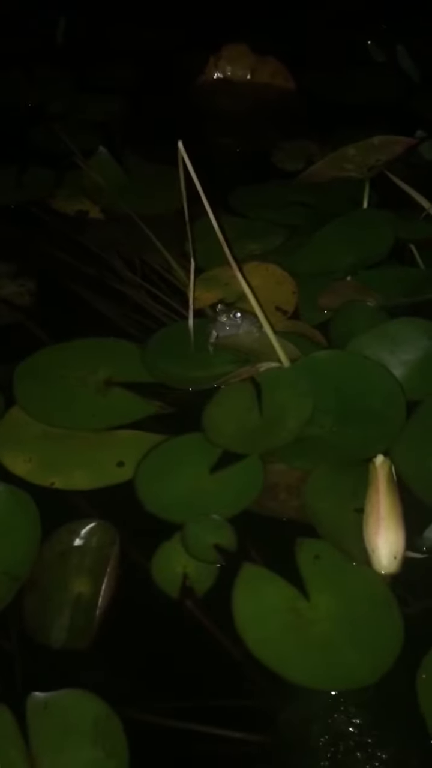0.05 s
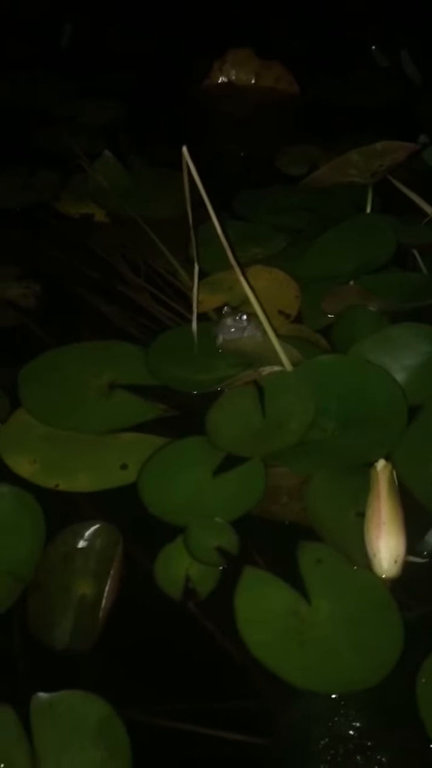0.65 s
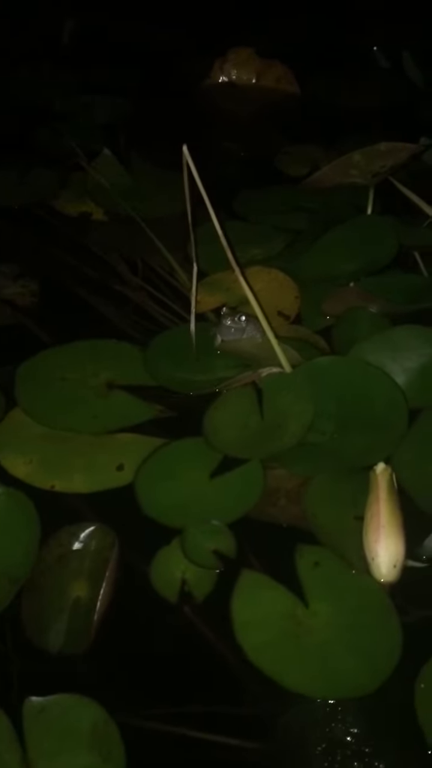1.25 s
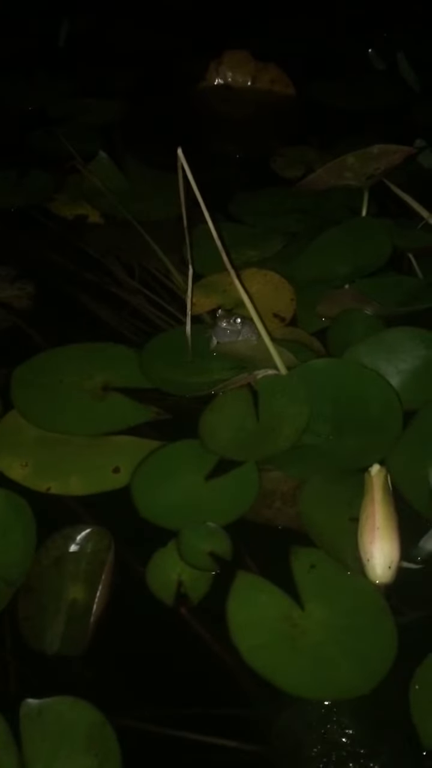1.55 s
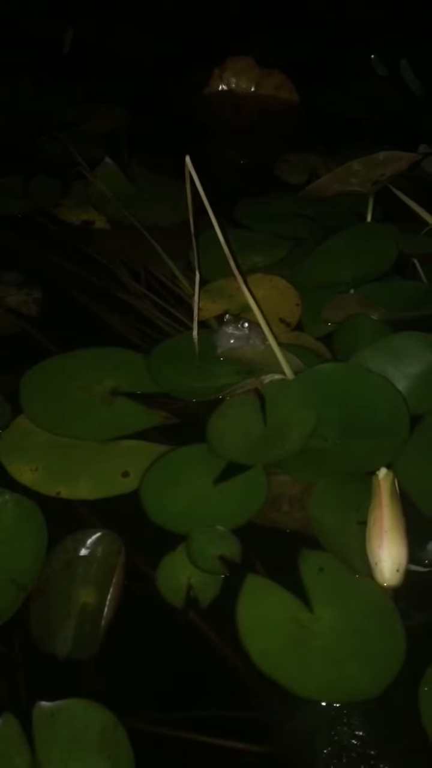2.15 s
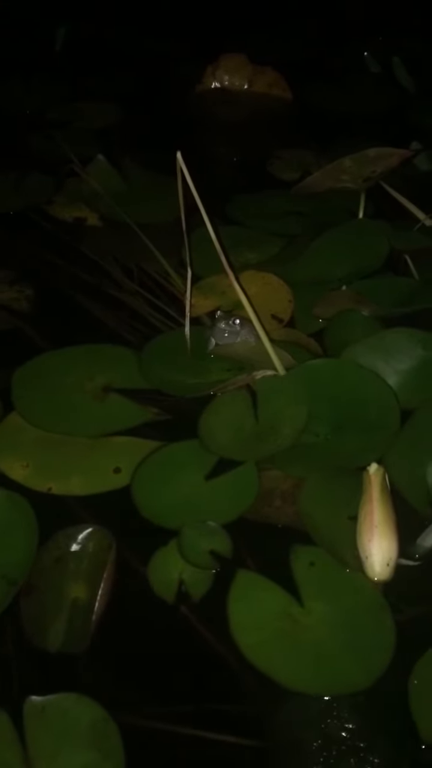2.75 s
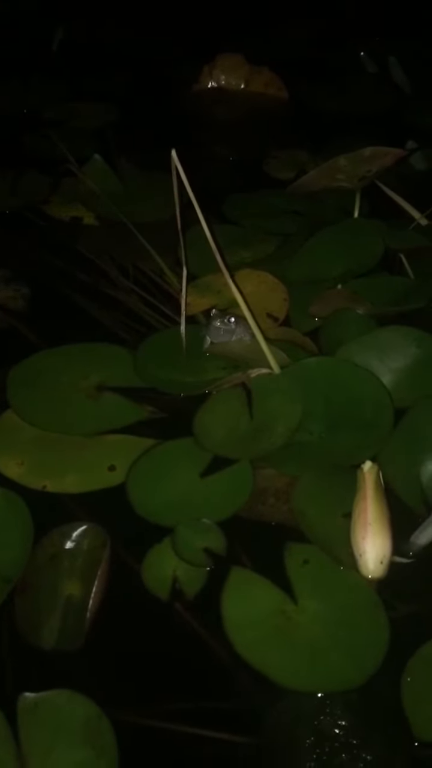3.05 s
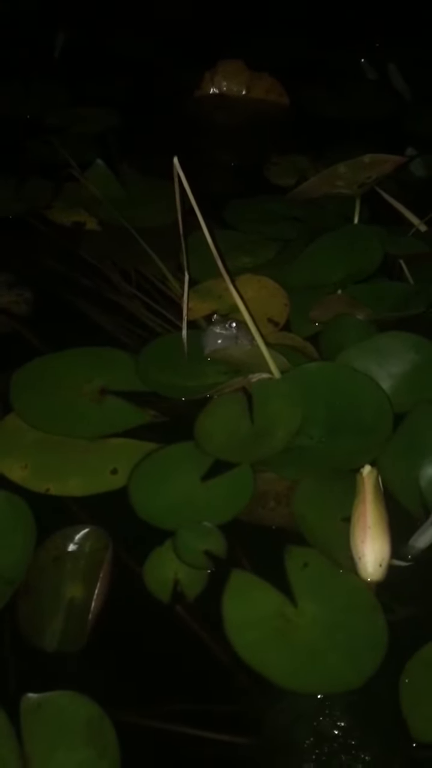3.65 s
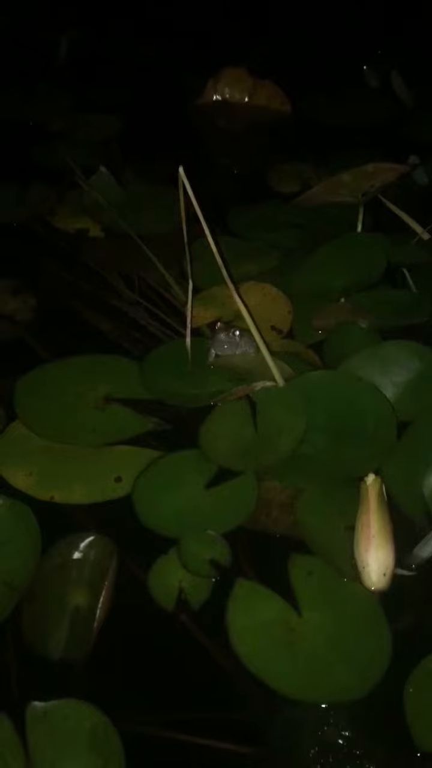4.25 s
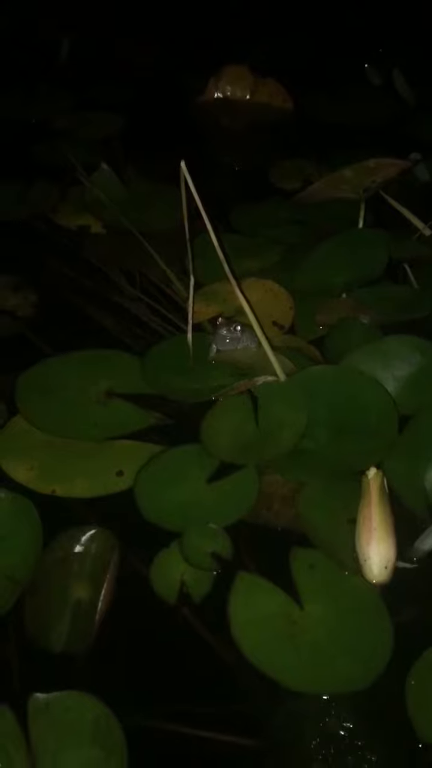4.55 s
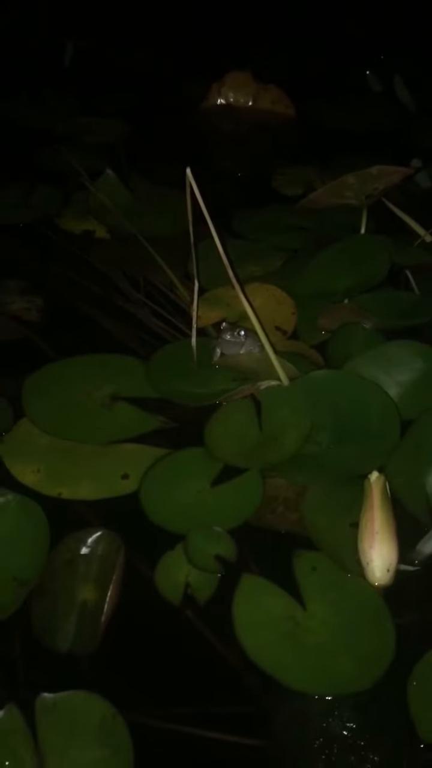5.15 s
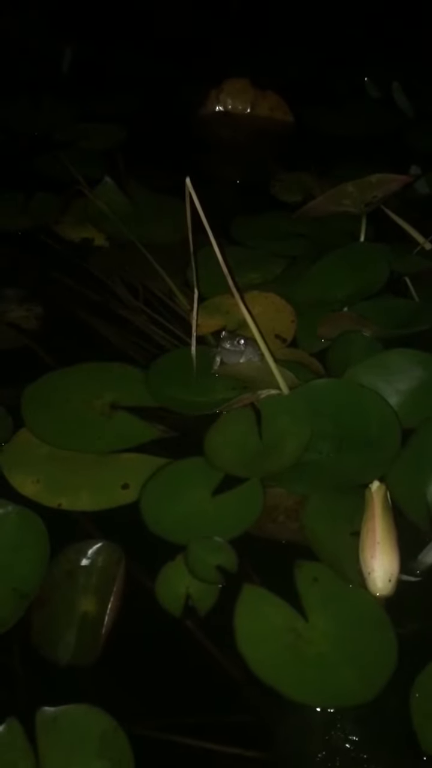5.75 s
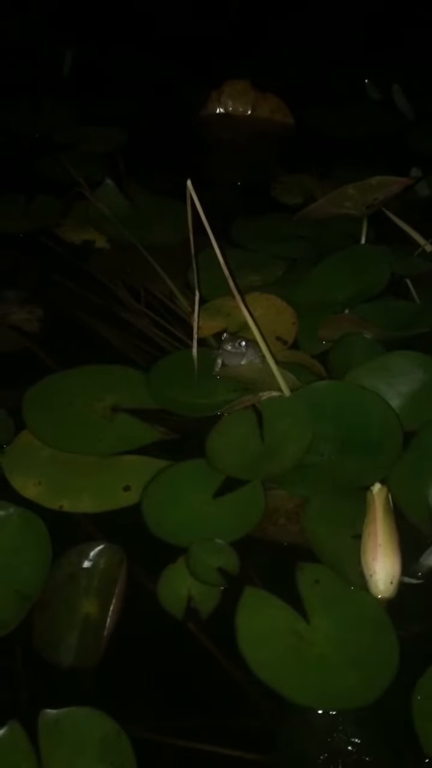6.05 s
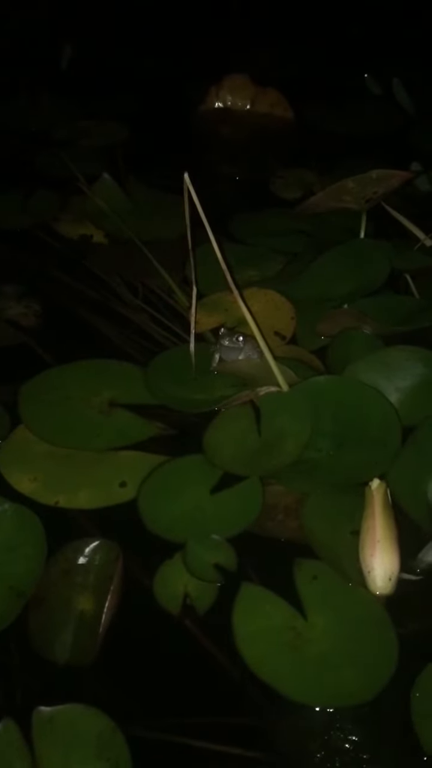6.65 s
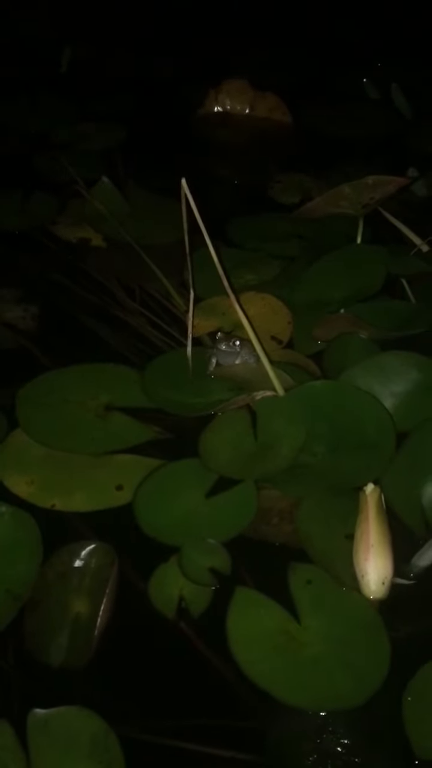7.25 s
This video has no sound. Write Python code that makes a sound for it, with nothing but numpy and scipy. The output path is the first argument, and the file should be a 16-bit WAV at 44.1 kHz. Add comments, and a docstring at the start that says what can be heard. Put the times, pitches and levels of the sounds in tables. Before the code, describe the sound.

At a garden pond at night, a tree frog close to the microphone gives three loud, short croaks, each a fast rattle of bright pulses. Two more frogs call softly from farther off, between and under them, with a slight echo. After the third loud croak, the faint drone of far traffic swells as a vehicle passes. The two distant frogs then call once each.

```python
"""A tree frog calls close by at a garden pond at night, and two more call from farther off.
Each call is a row of short pulses: puffs of air that shake the frog's vocal folds. A pulse slides up
in pitch near 1 kHz, but mostly we hear its second harmonic, the tone at twice that pitch. Calls start
soft, mostly hurried, then settle. Banks and walls echo them; far traffic drones and swells once.
The recorder turns everything down when the close frog is loud, then slowly turns it back up."""
import sys
import numpy as np
from scipy import signal
from scipy.fft import rfft, irfft, next_fast_len
from scipy.io import wavfile
from scipy.ndimage import map_coordinates

SR = 44100
rng = np.random.default_rng(int(sys.argv[2]) if len(sys.argv) > 2 else 0)


def dump(signal):
    """Clip the signal to [-1, 1] and save it as 16-bit WAV at the path in sys.argv[1]."""
    limited = np.clip(np.atleast_2d(signal).T, -1, 1)
    pcm = np.round(limited * 32767).astype(np.int16)
    wavfile.write(sys.argv[1], SR, pcm)


N = 326781

# far roads, with one vehicle passing: t/s, rumble/dB, low roar/dB, tyre hiss/dB
ROAD_LEVELS = [(0, -45, -72.5, -60.5), (1.2, -45, -73, -56.5), (2.6, -44, -71.5, -52),
               (3.2, -43.5, -59.5, -53), (3.6, -42.5, -70, -52.5), (4.3, -43.5, -59, -52),
               (4.65, -40, -49.5, -49), (4.95, -38, -53.5, -49), (5.5, -38, -66.5, -49),
               (6.2, -43, -66, -49.5), (7.41, -43.5, -70.5, -49.5)]
# a far engine: t/s, f/Hz, low drone/dB, higher hum/dB
ENGINE_NOTES = [(0, 61.1, -49, -65), (.9, 60.44, -54, -65), (1.3, 60.25, -45, -61.5),
                (2.7, 60.35, -45, -49.5), (3.4, 58.64, -42, -49.5), (4.3, 57.8, -40, -47.5),
                (4.75, 57.12, -38.5, -44), (5.1, 56.12, -35, -38.5), (5.6, 54.68, -40.5, -49.5),
                (6.15, 52.2, -46, -55), (6.9, 52.9, -46.5, -55), (7.41, 49, -47, -60.5)]
# colour (how strong each frequency is) of road and microphone noise: f/Hz, level/dB
RUMBLE_SHAPE = [(20, -24), (38, -14.5), (50, -8), (85, 1.5), (120, -2.5), (170, -4.5), (240, -11.5),
                (300, -20.5), (400, -31.5), (600, -58), (900, -120)]
ROAR_SHAPE = [(150, -32), (300, -2), (420, -8), (700, -11), (1100, -22.5), (2000, -81.5)]
TYRE_SHAPE = [(300, -26), (500, -22), (700, -7.5), (1000, -.5), (1350, -3.5), (1750, -3), (2250, -3.5),
              (2750, -1.5), (3380, -17), (3800, -19), (4250, -17.5), (4860, -28), (6400, -34.5),
              (9000, -52), (15500, -65)]
MIC_SHAPE = [(100, -2.5), (5000, 2), (9000, 3), (15500, -1.5)]
# one row a call: t/s, pulses, first gap/s, settled gap/s, full level/dB,
# first pulse's weakness/dB (how far below full it is), rise time/pulses, full pitch f/Hz
CLOSE_FROG_CALLS = [(.4027, 8, .0319, .0368, 1, 38, 1.65, 1122),
                    (2.1048, 14, .0315, .03625, 3, 36, 1.7, 1132),
                    (3.6184, 13, .03117, .03583, 3.5, 29.5, 1.75, 1136)]
SOFT_FROG_CALLS = [(.9149, 18, .03944, .03858, -23, 30, 3.7, 1165),
                   (6.8001, 17, .03632, .0385, -22, 19, 1.25, 1179)]
SLOW_FROG_CALLS = [(1.9659, 23, .04566, .0468, -17.5, 14, 1.1, 1167),
                   (5.7458, 18, .04044, .04774, -16.5, 15, .85, 1177)]
# how one pulse unfolds: t/pulse lengths, pitch ratio, lowest tone/dB, second harmonic/dB
PULSE_SHAPE = [(-1.2213, .68, -49, -57.5), (-0.8368, .72, -26, -23.5), (-0.4675, .8, -13.5, -11),
               (-0.3068, 0.858, -9.5, -4), (0.1456, 0.9385, -2.5, .5), (0.2521, 1.005, -2.5, -2),
               (0.4063, 1.058, -1.5, -8), (0.56, 1.083, -6, -24.5), (0.91, 1.2, -29.5, -34.5),
               (3, .59, -46, -73.5)]
# each call's higher harmonics against its second: f/Hz, level/dB
CLOSE_HARMONICS = [(2400, -7), (3100, -17.5), (3500, -27.5), (3750, -36.5), (4600, -32), (5300, -27),
                   (6300, -24.5), (7400, -31.5), (8100, -50), (10000, -55.5), (12000, -52.5), (15000, -51)]
SOFT_HARMONICS = [(3000, -27.5), (4400, -47), (5500, -48), (8000, -80.5)]
SLOW_HARMONICS = [(3000, -41), (3400, -33), (3700, -46), (4300, -43.5), (5500, -56.5), (8000, -87.5)]
# a bright, overloaded edge on the loudest pulses, harshest around the fifth: pulse number, level/dB
EDGE_LEVELS = [(0, -45), (2, -8.5), (4, 3), (8, -7), (13, -8)]
# air rushing through the opening voice box: t/pulse lengths, level/dB
AIR_LEVELS = [(-2.1, -56.5), (-0.99, -20.5), (-.5, 3), (0.17, 1.5), (0.44, -3.5), (0.65, -27.5),
              (1.2, -90.5)]
# a brief high hiss around the loudest pulses: t/pulse lengths, level/dB
HIGH_HISS_LEVELS = [(-1.8, -85), (-0.78, -48.5), (-0.083, -43), (.2, -33.5), (0.28, -45), (1, -54),
                    (1.7, -84)]
# colour of that air and hiss, and of the soft frog's voice across the pond: f/Hz, level/dB
AIR_SHAPE = [(550, -58), (850, -5.5), (1300, 1.5), (1600, 1.5), (2500, 3.5), (3100, -2), (3900, -30),
             (6000, -46.5), (8000, -61.5), (15000, -72.5)]
HIGH_HISS_SHAPE = [(2000, -29), (3800, -1), (5200, -1.5), (7300, -5.5), (8100, -21), (10000, -20.5),
                   (15000, -30)]
SOFT_FROG_SHAPE = [(850, 5), (950, 0.5), (1060, 4), (1300, -10.5), (1900, -10.5), (2080, 1.5), (2250, -3.5),
                   (2480, 1), (2800, -2.5)]
# quick echoes from water, leaves and bank: delay/s, level/dB
CLOSE_FROG_ECHOES = [(.0034, -20), (.0128, -22), (.018, -27.5)]
SOFT_FROG_ECHOES = [(.0053, -12.5), (0.0105, -11), (0.0169, -21.5)]
SLOW_FROG_ECHOES = [(.0052, -20.5), (.0122, -11.5), (.027, -20.5)]
# how long scattered sound lingers: f/Hz, t/s to fade by 60 dB
BANK_FADE = [(500, .042), (2200, 0.07), (5000, 0.054), (12000, .036)]
GARDEN_FADE = [(500, .4), (1200, .39), (2100, 1.55), (3200, 0.66), (12000, 0.28)]

LEVEL_SCATTER_DB, PITCH_SCATTER = .6, .0059  # from pulse to pulse
# per dB of weakness: share of pitch lost, share of length lost, dB the lowest tone gains on the second
FLATTER, SHORTER, DULLER = .0042, .009, .59


def amp(db):
    """Turn decibels into a number to multiply by."""
    return 10 ** (np.asarray(db) / 20)


def along(points, hz):
    """Read a table at hz, on a log frequency scale."""
    freqs, values = np.transpose(points)
    return np.interp(np.log(hz + 1), np.log(freqs + 1), values)


def curves(rows, at):
    """Read each later column of a table where its first column equals at."""
    points, *columns = np.transpose(rows)
    return [np.interp(at, points, column) for column in columns]


def wobble(rate, size=N):
    """A smooth random curve through rate points a second."""
    points = rng.standard_normal(int(size * rate / SR) + 4)
    return map_coordinates(points, [np.arange(size) * rate / SR])


def filtered(x, response):
    """Scale each frequency in x by response(hz)."""
    size = next_fast_len(N + SR // 2)
    return irfft(rfft(x, size) * response(np.fft.rfftfreq(size, 1 / SR)), size)[:N]


def noise(colour):
    """Noise of the given colour, with an average (rms) size of 1."""
    x = filtered(rng.standard_normal(N), lambda hz: amp(along(colour, hz)))
    return x / np.sqrt(np.mean(x ** 2) + 1e-20)


def add(track, t, sound):
    """Mix a sound into the track, centred on time t."""
    at = round(t * SR) - len(sound) // 2 + np.arange(len(sound))
    inside = (at >= 0) & (at < N)
    track[at[inside]] += sound[inside]


def engine_tone(hz, db, waver_db):
    """One engine note, a little unsteady in pitch and level."""
    phase = 2 * np.pi * np.cumsum(hz * (1 + .01184 * wobble(12))) / SR
    return amp(db + waver_db * wobble(11)) * np.sqrt(2) * np.sin(phase)


def traffic(hum_ratio=3.23):
    """Far roads: rumble, low roar, tyre hiss and the two notes of an engine."""
    t = np.arange(N) / SR
    rumble_db, roar_db, hiss_db = curves(ROAD_LEVELS, t)
    engine_hz, drone_db, hum_db = curves(ENGINE_NOTES, t)
    drone = engine_tone(engine_hz, drone_db, waver_db=1.5)
    hum = engine_tone(hum_ratio * engine_hz, hum_db, waver_db=.6)
    rumble = amp(rumble_db + 1.1 * wobble(7)) * noise(RUMBLE_SHAPE)
    hiss = amp(hiss_db + .82 * wobble(8.1)) * noise(TYRE_SHAPE)
    roar = amp(roar_db) * noise(ROAR_SHAPE)
    return drone + hum + rumble + roar + hiss


def call_pulses(calls, settle_pulses):
    """Calls grow louder and settle in pace. Gives pulse number, t/s, level/dB, weakness/dB, f/Hz."""
    for start, count, first_gap, settled_gap, full_db, first_weak_db, rise, full_hz in calls:
        number = np.arange(round(count))
        gaps = np.interp(number, [0, settle_pulses], [first_gap, settled_gap])
        times = start + np.cumsum(gaps) - gaps
        weak_db = first_weak_db * np.exp(-number / rise)
        louder, higher = rng.standard_normal((len(number), 2)).T
        db = full_db - weak_db + LEVEL_SCATTER_DB * louder
        yield from zip(number, times, db, weak_db, full_hz * (1 + PITCH_SCATTER * higher))


def pulse(db, low_db, pitch_hz, length_s, harmonics, edge_db, sweep, jitter, flutter):
    """One puff through the voice box: the pitch slides up, and the lowest tone rings on last."""
    size = SR // 20
    progress = (np.arange(size) - size // 2) / SR / length_s
    pitch_ratio, first_db, second_db = curves(PULSE_SHAPE, progress)
    hz = pitch_hz * pitch_ratio ** sweep * (1 + jitter * wobble(900, size))
    phase = 2 * np.pi * (np.cumsum(hz) / SR + rng.random())
    voice = amp(low_db + first_db) * np.sin(phase) + amp(db + second_db) * np.sin(2 * phase)
    # higher harmonics flutter, and the sound is brightest at the pulse's peak
    for k in range(3, 15):
        bright_db = second_db * (1 + .37 * min(k - 3, 4)) + (k > 4) * edge_db
        waver = 1 + flutter * wobble(1203, size)
        level = amp(db + bright_db + along(harmonics, k * hz))
        voice += level * waver * np.sin(k * phase + 2 * np.pi * rng.random())
    return voice * signal.windows.tukey(size, .2)


def echoed(x, echoes):
    """A sound plus later, quieter copies that bounce back."""
    return filtered(x, lambda hz: 1 + sum(amp(db) * np.exp(-2j * np.pi * hz * delay)
                                          for delay, db in echoes))


def scattered(x, fade):
    """A blur of many echoes; each frequency fades at its own speed."""
    hz, t, spectrum = signal.stft(rng.standard_normal(SR), SR, nperseg=256)
    tail = signal.istft(spectrum * amp(-60 * t / along(fade, hz)[:, None]), SR, nperseg=256)[1]
    tail = np.pad(tail / np.linalg.norm(tail), (SR // 200, 0))  # arrives 5 ms late
    return signal.fftconvolve(x, tail)[:N]


def surroundings(call, walls, bank_db, garden_db):
    """A call with its echoes off far walls (delay/s, level/dB), the bank and the garden."""
    bank = amp(bank_db) * scattered(call, BANK_FADE)
    garden = amp(garden_db) * scattered(call, GARDEN_FADE)
    return echoed(call, walls) + bank + garden


def close_frog(full_pulse_s=.01432):
    """Loud calls; the weak opening pulses are lower, shorter and more breathy."""
    voice, air, hiss = np.zeros((3, N))
    pulse_time = np.arange(-SR // 40, SR // 40) / SR
    for number, t, db, weak_db, hz in call_pulses(CLOSE_FROG_CALLS, settle_pulses=6):
        low_db = db - 8 + DULLER * weak_db
        length_s = full_pulse_s * (1 - SHORTER * weak_db)
        edge_db, = curves(EDGE_LEVELS, number)
        add(voice, t, pulse(db, low_db, hz * (1 - FLATTER * weak_db), length_s, CLOSE_HARMONICS,
                            edge_db, sweep=1.02, jitter=.009, flutter=.35))
        leak_db = low_db - 18.5 + .12 * weak_db
        air_db, = curves(AIR_LEVELS, pulse_time / length_s)
        hiss_db, = curves(HIGH_HISS_LEVELS, pulse_time / length_s)
        add(air, t, amp(leak_db + air_db))
        add(hiss, t, amp(db + edge_db + hiss_db))
    call = voice + air * noise(AIR_SHAPE) + hiss * noise(HIGH_HISS_SHAPE)
    call = amp(1.62) * echoed(call, CLOSE_FROG_ECHOES)
    return surroundings(call, walls=[(.087, -43.5), (.23, -49.5)], bank_db=-19, garden_db=-45)


def soft_frog(pulse_s=.0128):
    """Soft, quick calls from farther off, coloured by strong echoes off the water."""
    call = np.zeros(N)
    for _, t, db, weak_db, hz in call_pulses(SOFT_FROG_CALLS, settle_pulses=16):
        low_db = db - 10.5 + DULLER * weak_db
        add(call, t, pulse(db, low_db, hz, pulse_s, SOFT_HARMONICS,
                           edge_db=-31.5, sweep=.99, jitter=.006, flutter=.4))
    call = filtered(call, lambda hz: amp(along(SOFT_FROG_SHAPE, hz)))
    call = amp(-1.1) * echoed(call, SOFT_FROG_ECHOES)
    return surroundings(call, walls=[(.074, -16.5)], bank_db=-12, garden_db=-19.5)


def slow_frog(pulse_s=.0135, ring_hz=3408, ring_width_hz=120):
    """Slower far calls, nearly all second harmonic, with a faint high ring in the voice."""
    call = np.zeros(N)
    for _, t, db, weak_db, hz in call_pulses(SLOW_FROG_CALLS, settle_pulses=20):
        add(call, t, pulse(db, db - 25.5, hz * (1 - FLATTER * weak_db), pulse_s, SLOW_HARMONICS,
                           edge_db=-24, sweep=.84, jitter=.0059, flutter=.43))
    ring = filtered(call, lambda hz: 1j * hz * ring_width_hz
                    / (ring_hz ** 2 - hz ** 2 + 1j * hz * ring_width_hz))
    call = amp(-1.2) * echoed(call + amp(5) * ring, SLOW_FROG_ECHOES)
    return surroundings(call, walls=[(.076, -20)], bank_db=-14.5, garden_db=-23.5)


def auto_volume(x, limit_db=-5, turn_down_s=.033, hold_s=.098, return_db_per_s=25.5):
    """Peaks over the limit turn the volume down; after a short wait it creeps back."""
    block = SR // 250
    step_s = block / SR
    peaks = np.abs(np.pad(x, (0, -N % block))).reshape(-1, block).max(axis=1)
    cut_db, waited_s, cuts = 0, 0, []
    for over_db in 20 * np.log10(peaks + 1e-9) - limit_db:
        waited_s = 0 if over_db > cut_db / 2 else waited_s + step_s
        cut_db += max(over_db - cut_db, 0) * step_s / (turn_down_s + step_s)
        cut_db = max(cut_db - return_db_per_s * np.clip(waited_s - hold_s, 0, step_s), 0)
        cuts.append(cut_db)
    return x * amp(-np.interp(np.arange(N) / block, np.arange(len(cuts)) + 1, cuts))


def scene():
    """Three frogs over far traffic and faint microphone hiss, in one channel."""
    frogs = close_frog() + slow_frog() + soft_frog()
    return (frogs + traffic() + amp(-79.5) * noise(MIC_SHAPE))[None]


def record(dry, ceiling=.76, hardness=6, lopsided=.0045, top_hz=15750):
    """The recorder sets its own volume, rounds off the loudest pulses and drops the highest treble."""
    x = auto_volume(dry[0])
    x = x / (1 + np.abs(x / ceiling) ** hardness) ** (1 / hardness)
    # the wave's tops and bottoms bend slightly differently
    x = x + lopsided * filtered(x ** 2, lambda hz: hz / (hz + 100))
    return filtered(x, lambda hz: hz < top_hz)[None]


dry = scene()
out = record(dry)
dump(out)
```